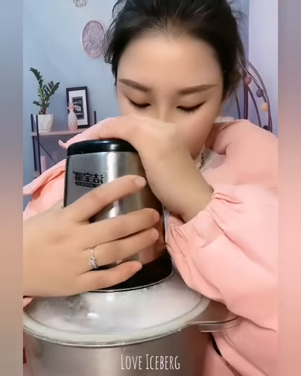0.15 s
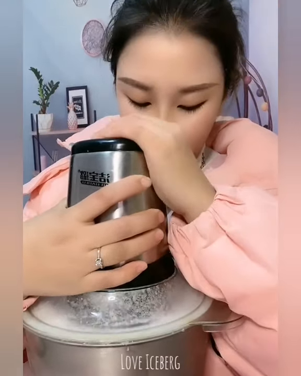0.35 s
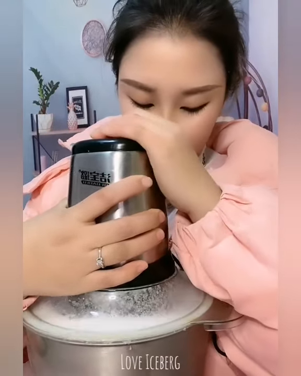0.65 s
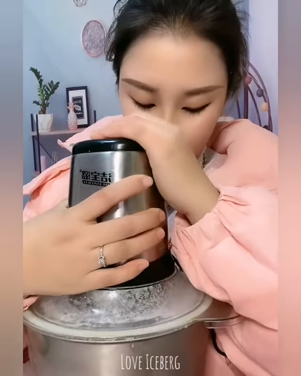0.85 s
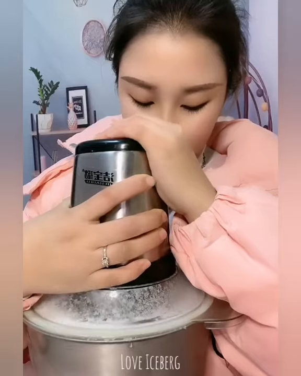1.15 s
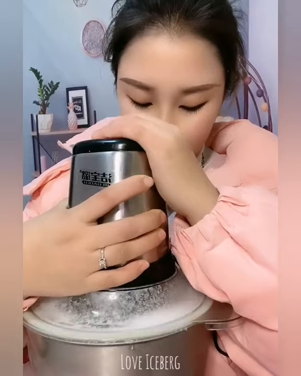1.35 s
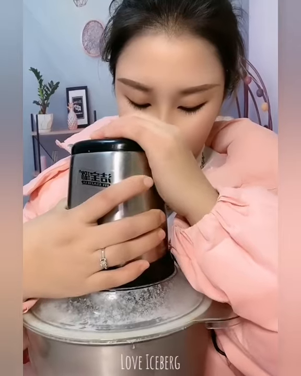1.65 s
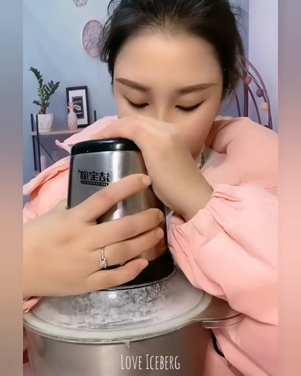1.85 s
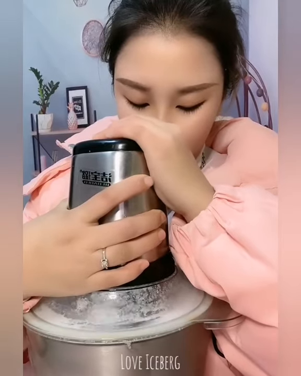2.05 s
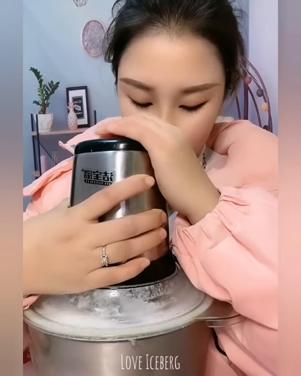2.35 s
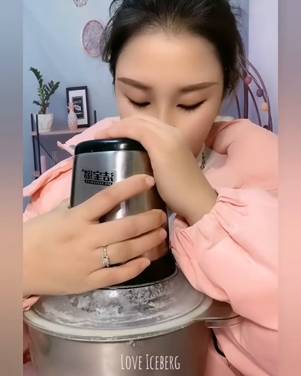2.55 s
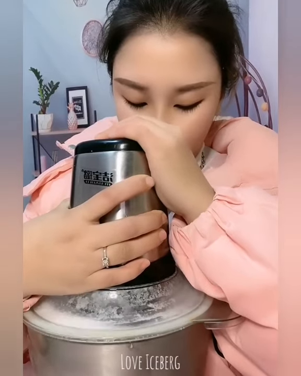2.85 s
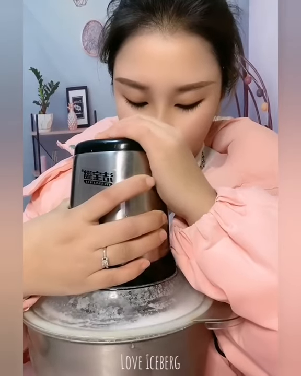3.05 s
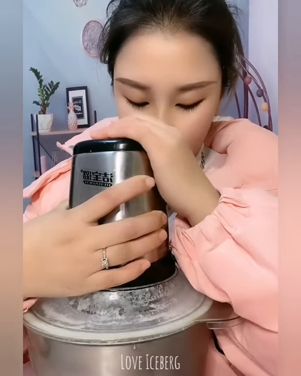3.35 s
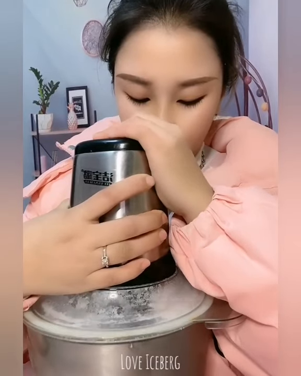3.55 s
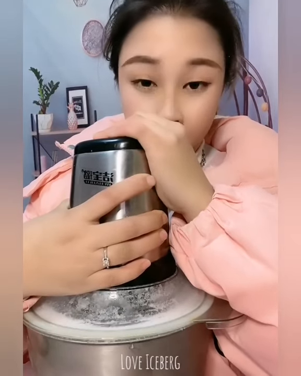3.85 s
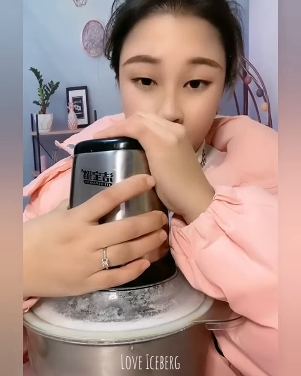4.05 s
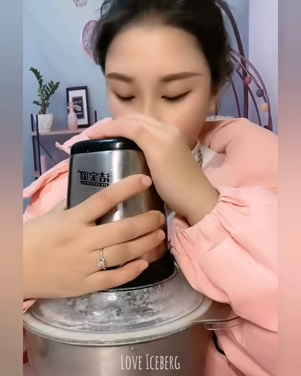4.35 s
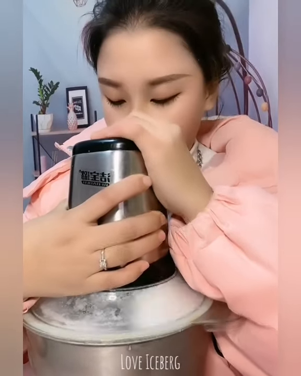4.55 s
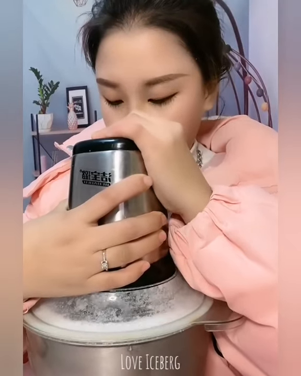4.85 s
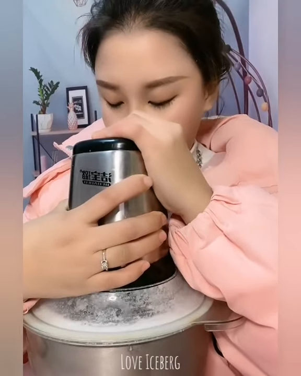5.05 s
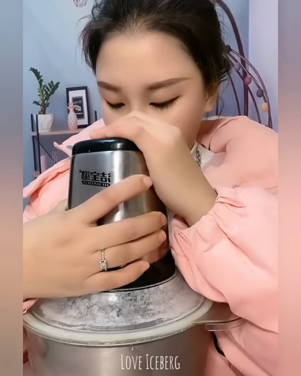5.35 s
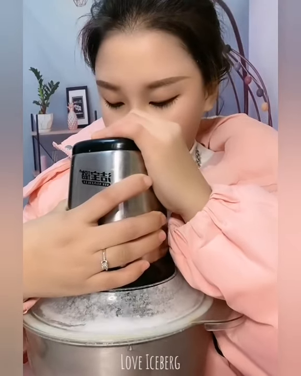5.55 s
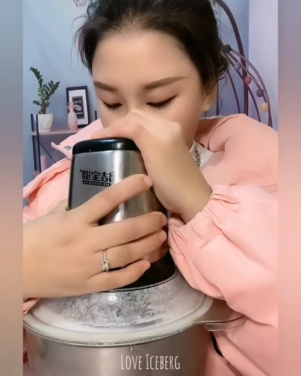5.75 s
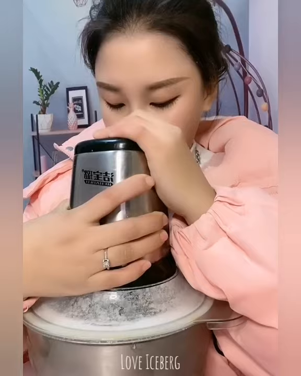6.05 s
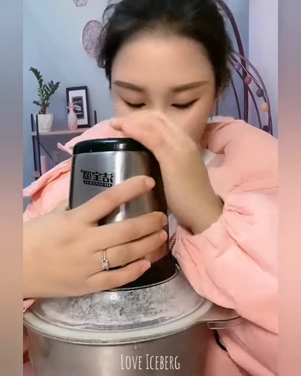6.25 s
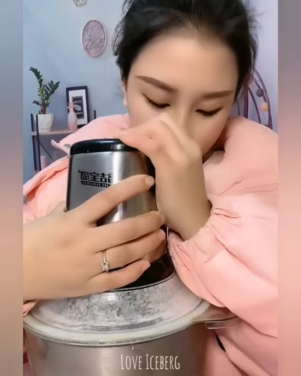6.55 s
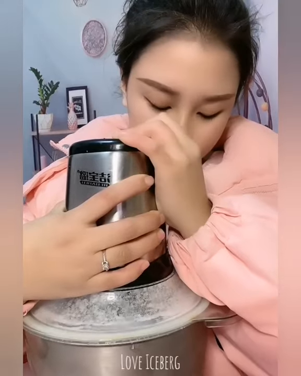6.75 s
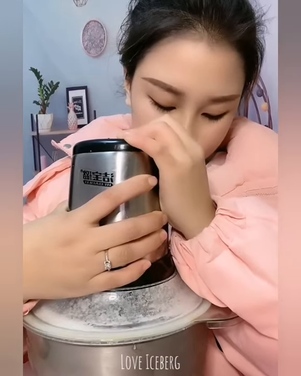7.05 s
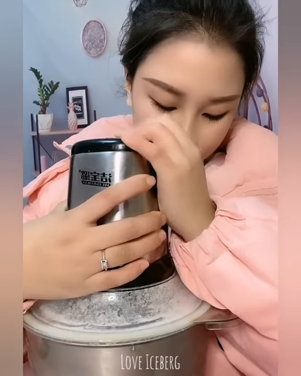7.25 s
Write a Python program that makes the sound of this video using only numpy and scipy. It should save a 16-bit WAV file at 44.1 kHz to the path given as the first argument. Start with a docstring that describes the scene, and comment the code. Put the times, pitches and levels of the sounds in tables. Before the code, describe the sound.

An electric food chopper is pulsed eight times over ice in a steel bowl, each loud rattling burst whining up, then tumbling to a stop.

```python
"""Eight noisy bursts: an electric food chopper is pulsed over ice cubes in a steel bowl, close by in a small room.
At each press the motor whines up and the ice churns: lumps thud, the steel clatters, chips crackle.
After each release the blades coast and the last lumps tumble; the bowl hums in short swells.
Random lumps and chips drive a filtered bowl; whine, growl and hum are tones; whole cubes strike one by one."""
import sys
import numpy as np
from scipy import signal
from scipy.fft import rfft, irfft
from scipy.io import wavfile
from scipy.ndimage import uniform_filter1d

SR = 44100
rng = np.random.default_rng(int(sys.argv[2]) if len(sys.argv) > 2 else 0)


def transcribe(signal):
    """Save signal, clipped to [-1, 1], as a 16-bit WAV file at the path in sys.argv[1]."""
    frames = np.atleast_2d(signal).T
    limited = np.clip(frames, -1, 1)
    pcm = np.round(limited * 32767).astype(np.int16)
    wavfile.write(sys.argv[1], SR, pcm)


N = 326781
TIME = np.arange(N) / SR
CUTOFF_HZ = 15900
MESH_PER_TURN = 27  # gear teeth that mesh in one turn of the blade shaft

# presses of the switch: on t/s, off t/s, gear whine at full speed f/Hz, whine level before a common trim/dB,
#   extra ring of the wall (gain), extra ring of the lid (gain), tumbling of the ice after release t/s,
#   extra rumble/dB, extra crackle/dB
PRESS_TABLE = [(0.111, 0.575, 2940, -25, 0.041, .05, 0.17, 0.5, -1),
               (0.921, 1.277, 3052, -20.5, 1.3, .05, 0.12, -0.5, -.8),
               (1.702, 2.191, 2990, -19, 1.5, 0.055, 0.17, -0.5, 0),
               (2.573, 3.08, 3000, -20, 0.69, .05, 0.18, -5.5, -1),
               (3.497, 4.131, 3090, -21.5, 0.092, 0.33, 0.14, 2, -1),
               (4.523, 5.12, 3120, -21, 0.042, 0.9, .2, 5.5, 0.75),
               (5.492, 6.027, 3160, -18.5, 0.047, 0.55, 0.19, 0.5, -0.8),
               (6.428, 7.218, 3170, -20, 1.6, 0.65, .2, -3, -2.35)]
# crackle of the churning ice: level at full speed/dB, change towards standstill/dB,
#   linger after the tumbling t/s, fall after that/(dB/s), level at rest/dB
CRACKLE_REGISTER = (-19.1, -12.5, 0, 170, -58)


def from_db(db):
    """Turns decibels into an amplitude gain."""
    return 10 ** (np.asarray(db) / 20)


def rms_one(x):
    """Scales a signal to an rms of 1."""
    return x / np.sqrt(np.mean(x ** 2) + 1e-20)


def at_hz(points, hz):
    """Reads a table on a log-frequency axis."""
    table_hz, value = np.array(points).T
    return np.interp(np.log(hz + 1e-9), np.log(table_hz), value)


def passed(x, hz, kind, order=2):
    """Butterworth filter."""
    sections = signal.butter(order, hz, kind, fs=SR, output="sos")
    return signal.sosfilt(sections, x + 1e-18)


def drift(rate):
    """Random wander with an rms of 1, drawn through `rate` new values a second."""
    knots = np.arange(0, TIME[-1] + 1, 1 / rate)
    return rms_one(np.interp(TIME, knots, rng.standard_normal(len(knots))))


def steadied(x, window_s):
    """Brings the short-term rms to 1 and keeps the faster grain."""
    size = int(window_s * SR)
    power = uniform_filter1d(uniform_filter1d(x ** 2, size), size)
    return x / np.sqrt(np.abs(power) + 1e-12)


def rough_tone(hz, shakes_per_s):
    """A tone whose strength and phase are shaken at random, as by blows on the blades."""
    phase = 2 * np.pi * np.cumsum(hz) / SR
    return np.sin(phase) * drift(shakes_per_s) + np.cos(phase) * drift(shakes_per_s)


def churn(bowl, pitch, speed, press, snow_hz=6000, soft_hz=170):
    """Ice and drive shake the bowl; powdered ice swishes round it and keeps sliding when the blades slow."""
    # registers of the churning ice: level at full speed/dB, change towards standstill/dB,
    #   linger after the tumbling t/s, fall after that/(dB/s), level at rest/dB
    rumble_register = (-32.8, 3.5, -0.07, 103, -51)
    thud_register = (-18, -3.5, 0, 112, -50)
    clatter_register = (-14, -8.5, 0, 195, -50.5)
    snow_register = (-32, -14, .09, 380, -73)
    wall_band_hz, lid_band_hz = [1090, 1220], [3400, 3750]
    heave_depth_db, heaves_per_s, thud_heave_share = 1.65, 11, 0.2

    body = signal.oaconvolve(ice(pitch, speed) + growl(pitch, speed), bowl)[:N]
    low, clatter, crackle = registers(body)
    rumble = passed(low, 150, "low", order=4)
    thud = passed(low, 146, "high", order=4)
    soft_thud = passed(thud, soft_hz, "low", order=1)
    thud = soft_thud * (1 - speed) + thud * speed  # slow lumps land softly

    # bare steel rings more than steel packed with ice
    *_, wall_ring, lid_ring, _, rumble_db, crackle_db = np.array(PRESS_TABLE)[press].T
    clatter = clatter + wall_ring * passed(clatter, wall_band_hz, "band", order=1)
    crackle = crackle + lid_ring * passed(crackle, lid_band_hz, "band", order=1)

    hiss = rng.standard_normal(N)
    snow = passed(signal.oaconvolve(hiss, bowl)[:N], snow_hz, "high")
    heave_db = heave_depth_db * drift(heaves_per_s)  # the load shifts and the low end surges
    layers = [(rumble, rumble_register, rumble_db + heave_db),
              (thud, thud_register, thud_heave_share * heave_db),
              (clatter, clatter_register, 0),
              (crackle, CRACKLE_REGISTER, crackle_db),
              (snow, snow_register, crackle_db)]
    mix = 0
    for layer, register, extra_db in layers:
        mix = mix + churn_level(register, extra_db, speed, press) * steadied(layer, 0.064)
    return mix


def ice(pitch, speed, lumps_per_s=280, idle_per_s=110, spread_db=5.5,
        chips_per_s=2000, chip_spread_db=5.0, chips_db=-15, sweep_db=3, count=10):
    """Blades throw lumps and showers of chips at random spots of the wall, in surges as they sweep round."""
    turns_per_s = pitch / MESH_PER_TURN * (1 + 0.23 * drift(25))
    sweep = np.sin(2 * np.pi * np.cumsum(turns_per_s) / SR)
    surge = from_db(sweep_db * sweep * speed)

    lump_hits = rng.random(N) < (idle_per_s + lumps_per_s * speed) / SR
    lumps = lump_hits * from_db(spread_db * np.clip(rng.standard_normal(N), -2, 2))
    chip_hits = rng.random(N) < chips_per_s / SR
    chips = chip_hits * from_db(chips_db + chip_spread_db * np.minimum(rng.exponential(1, N), 4))

    sign, spot = rng.choice([-1, 1], N), rng.integers(0, count, N)
    wall = 0
    for k in range(count):
        here = surge * sign * (spot == k)
        lump_force = passed(lumps * here, 5900, "low", order=1)
        chip_force = passed(chips * here, 1400, "high", order=1)  # light chips carry no bass
        wall = wall + signal.oaconvolve(lump_force + chip_force, impact())[:N]
    return steadied(wall, 0.13)


def impact(crack=0.49, room_db=-15, room_t60=0.45, size=8192, count=10):
    """One spot of the wall: a sharp crack, dense short modes as bands of dying noise, then a faint room tail."""
    # how long one impact rings: f/Hz, fall by 60 dB t/s
    ring_times = [(100, 0.051), (700, 0.039), (2500, 0.051), (10000, 0.022)]
    t, edges, out = TIME[:size], np.geomspace(30, CUTOFF_HZ, count), np.zeros(size)
    room = from_db(room_db) * rms_one(from_db(-60 * t / room_t60))
    for low, high in zip(edges, edges[1:]):
        t60 = at_hz(ring_times, np.sqrt(low * high))
        decay = rms_one(from_db(-60 * t / t60)) + room
        noise = rng.standard_normal(size) * decay
        out += passed(noise, [low, high], "band") / np.sqrt(size)
    out[0] += crack
    return out


def growl(pitch, speed, growl_db=-16, coast_db=8.5):
    """Rough low orders of the blade shaft; they stand out as the blades slow down."""
    # growl of the drive: multiple of the shaft's turning rate, level among the orders/dB
    shaft_orders = [(1, -8), (3, -1.5), (4, -2), (7, -2), (8, -3), (12, -1), (18, -1), (27, 0)]
    shaft = pitch / MESH_PER_TURN
    orders = 0
    for multiple, level_db in shaft_orders:
        orders = orders + from_db(level_db) * rough_tone(multiple * shaft, 22 + 3 * multiple)
    return from_db(growl_db + coast_db * (1 - speed)) * np.sqrt(speed) * rms_one(orders)


def bowl_response(size=8192):
    """Causal (minimum-phase) impulse response of the bowl: its resonances stand on the broad colour."""
    # broad colour of the filled bowl: f/Hz, relative level/dB
    colour = [(18, -70), (30, -16.5), (100, -6.5), (157, -9), (198, -7), (232, -6.5), (326, -0.5),
              (629, -7), (775, -5.5), (982, -7), (1150, -8.5), (2210, -15.5), (5690, -18), (8660, -19.5),
              (15800, -48)]
    # resonances of bowl and lid: centre f/Hz, width f/Hz, lift/dB
    resonances = [(114, 9.5, 1.5), (197.5, 26.5, 6), (256, 17, 6), (331, 63, 3.5), (460, 56, 6),
                  (715, 29, 5.5), (781, 89, 10.5), (1079, 22, 7), (1132, 11.4, 8.5), (1187, 16, 5),
                  (1283, 28, 7), (1655, 26, 6), (2000, 28, 3.5), (2780, 27, 3), (3248, 57, 9),
                  (3502, 107, 8), (3865, 61, 6), (4285, 270, 6.5), (4965, 320, 5.5), (5650, 140, 3.5),
                  (8400, 430, 1), (11140, 790, 4.5)]
    hz = np.arange(size // 2 + 1) * SR / size
    level_db = at_hz(colour, hz)
    for centre, width, lift_db in resonances:
        level_db = level_db + lift_db / (1 + (2 * (hz - centre) / width) ** 2)
    # folding the cepstrum puts the energy as early as possible
    cepstrum = irfft(np.log(from_db(level_db)))[:size // 2]
    cepstrum[0] = 0  # leaves the overall level out
    return irfft(np.exp(rfft(2 * cepstrum, size)))[:size // 2]


def registers(x, thud_hz=550, crack_hz=1900):
    """Splits bowl sound into the thud of lumps, the clatter of steel and the crackle of chips."""
    thud = passed(x, thud_hz, "low", order=4)
    clatter = passed(x, [thud_hz, crack_hz], "band", order=4)
    crackle = passed(x, crack_hz, "high", order=4)
    return thud, clatter, crackle


def churn_level(register, extra_db, speed, press, pick_up_s=0.0051):
    """Gain of one register: comes in with the press, follows blade speed, dies once the ice stops tumbling."""
    full_db, slow_db, linger_s, fall_db_per_s, rest_db = register
    on, off, tumble_s = np.array(PRESS_TABLE)[:, [0, 1, 6]].T
    since_on = np.maximum(TIME - on[press], 0)
    pick_up = 1 - np.exp(-(since_on / pick_up_s) ** 2)  # the blades take hold of the ice
    settled_s = np.maximum(TIME - (off + tumble_s + linger_s)[press], 0)
    level_db = full_db + extra_db + slow_db * (1 - speed) - fall_db_per_s * settled_s
    return np.hypot(pick_up * from_db(level_db), from_db(rest_db))


def motor(spin_up_s=.048, loosen_s=.29, drag=.2, coast_s=.26, friction=.15):
    """Whine pitch, speed 0-1 and press number: a quick start, a slow gain as the ice loosens, then coasting."""
    on, off, full_hz = np.array(PRESS_TABLE)[:, :3].T
    press = np.maximum(np.searchsorted(on, TIME) - 1, 0)
    powered = np.clip(TIME - on[press], 0, (off - on)[press])
    coasting = np.maximum(TIME - off[press], 0)
    driven = 1 - (1 - drag) * np.exp(-powered / spin_up_s) - drag * np.exp(-powered / loosen_s)
    run_down = (1 + friction) * np.exp(-coasting / coast_s) - friction  # friction brings a full stop
    speed = np.maximum(driven * run_down, 0)
    return full_hz[press] * speed, speed, press


def whine(pitch, speed, press, housing_hz=2580, housing_width_hz=560,
          octave_db=-4, whine_db=-3, unload_s=0.032):
    """Gear mesh tone and octave: strong where it crosses the housing's resonance, fading as the gears unload."""
    off, _, level_db = np.array(PRESS_TABLE)[press, 1:4].T
    load = np.exp(-np.maximum(TIME - off, 0) / unload_s)
    housing = 1 / np.sqrt(1 + (2 * (pitch - housing_hz) / housing_width_hz) ** 2)
    shaken = pitch * (1 + .012 * drift(60))
    mesh, octave = rough_tone(shaken, 260), rough_tone(2 * shaken, 580)
    gain = from_db(level_db + whine_db) * load * speed * housing
    return gain * (mesh + from_db(octave_db) * octave)


def blows(bowl, thud_db=-7, clatter_db=-9, crack_db=-7, ring_db=-14, ring_t60=0.037,
          snap=2.5, snap_hz=6500, bite_s=0.00059, size=8192):
    """Whole cubes strike: each has its own weight, brittleness and ring, and snaps brightly as it splits."""
    # hard blows of cubes on blade and wall: t/s, strength/dB, thud re strength before trim/dB,
    #   crack re strength before trim/dB, ringing pitch f/Hz
    cube_blows = [(0.054, -36.5, -16, 2, 2040), (0.127, 0.5, -4.5, -7.5, 2000), (0.653, -12, 8, -17, 1940),
                  (0.679, -18.5, -14, 3.5, 1900), (0.738, -16, 10, 3, 3170), (0.793, -24, 2, -24, 1640),
                  (0.826, -25, 11, -8, 1620), (0.936, -0.5, -3, -8.5, 1500), (0.97, -13.5, -17, 2.5, 3300),
                  (1.017, -16.5, -5, 3.5, 2400), (1.342, -14, 4, -17, 1430), (1.355, -19, 0, -0.5, 1600),
                  (1.412, -7, 3, 1, 1540), (1.45, -23, 10, -3, 6740), (1.545, -12, -10, -7.5, 1520),
                  (1.568, -15.5, -3.5, -5, 1600), (1.645, -19.5, -7, -22, 1550),
                  (1.668, -15, -24, -12, 1520), (1.716, -6.5, -25, 1.5, 6080), (2.273, -19.5, 9, 9.5, 1610),
                  (2.314, -16.5, 13.5, -5, 1610), (2.361, -11.5, -2, -5.5, 2060),
                  (2.402, -9.5, 1.5, -2.5, 3227), (2.494, -19, -16, -1, 1880),
                  (2.518, -18.5, -12, -11, 1580), (2.589, 1.5, -13, -10.5, 1566),
                  (3.114, -4.5, -20, -19, 4300), (3.199, -12, 6, -4, 1700), (3.264, -6, 0.5, -6.5, 1710),
                  (3.4, -19, -18, -2, 1960), (3.51, -6, 3.5, -4.5, 1880), (4.279, -10, 7.5, -0.5, 1380),
                  (4.536, -4.5, 1, 2, 3340), (5.335, -16.5, 10, 3.5, 1680), (5.509, 1.5, -4.5, -7.5, 1618),
                  (6.133, -14, 10, -19, 3130), (6.241, -17.5, 11.5, 7.5, 5126), (6.44, 1, -29, -13, 2000),
                  (6.485, -13, -23, 4.5, 3220)]
    soft_db, hard_db, soft_hz = -21.5, -13, 5370  # from dull knocks to bright splits as they get louder
    split_s, split_db = 0.0069, -12  # a struck cube cracks once more as it splits

    out, t = np.zeros(N + size), TIME[:size]
    bite = 1 - np.exp(-t / bite_s)  # brittle ice gives way gradually
    for s, strength_db, weight_db, brittle_db, hz in cube_blows:
        strike = impact(crack=.7, room_db=-16, room_t60=.22)
        thud, clatter, crack = registers(signal.fftconvolve(strike, bowl)[:size])

        hard = np.clip((strength_db + brittle_db - soft_db) / (hard_db - soft_db), 0, 1)
        bright = crack + snap * passed(crack, snap_hz, "high", order=1)
        dull = passed(crack, soft_hz, "low")
        crack = hard * bright + (1 - hard) * dull
        split_delay = split_s * rng.uniform(.7, 1.5)
        crack = crack + from_db(split_db) * np.interp(t - split_delay, t, crack, left=0)
        ring = np.sin(2 * np.pi * hz * t) * from_db(-60 * t / ring_t60)

        start = int(s * SR)
        layers = [(thud, thud_db + weight_db), (clatter, clatter_db),
                  (crack, crack_db + brittle_db), (ring, ring_db + .5 * brittle_db)]
        for layer, level_db in layers:
            part = layer * bite
            onset_rms = np.std(part[:size // 20])
            out[start:start + size] += from_db(strength_db + level_db) * part / onset_rms
    return out[:N]


def shards(speed, press, count=420, shard_db=-2, spread_db=4.5,
           low_hz=1500, high_hz=9500, cycles=110, size=4096):
    """Flying splinters tinkle, each at the pitch of its own size, and follow blade speed and crackle level."""
    out, t = np.zeros(N + size), TIME[:size]
    for when, pitch_share, chance in rng.random((count, 3)):
        hz, start = low_hz * (high_hz / low_hz) ** pitch_share, int(when * N)
        ring = np.sin(2 * np.pi * hz * t) * from_db(-60 * t * hz / cycles)  # falls 60 dB in `cycles` swings
        strength = from_db(-spread_db * np.log(.05 + chance))  # few loud, many faint
        out[start:start + size] += strength * np.sqrt(low_hz / hz) * ring
    return out[:N] * speed * churn_level(CRACKLE_REGISTER, shard_db, speed, press)


def hum(lower_hz=204.4, upper_hz=293, rise_db_per_s=220, fall_db_per_s=91):
    """The bowl's two lowest modes swell and sing on while the blades run down, with a slight pitch wobble."""
    # swells of the hum: crest t/s, lower mode level/dB, upper mode re lower/dB
    swells = [(0.0, -33, -13), (0.77, -16.5, -9), (1.49, -25, -2), (2.38, -15.5, -15), (3.28, -25, -6),
              (4.31, -24, 0.5), (5.31, -23.5, 2), (6.24, -16.5, -13)]
    wobble = 0.0047 * np.cumsum(drift(29.6)) / SR
    phase = 2 * np.pi * (TIME + wobble)
    lower, upper = np.sin(lower_hz * phase), np.sin(upper_hz * phase)
    out = 0
    for s, crest_db, upper_db in swells:
        below_crest_db = np.maximum(rise_db_per_s * (s - TIME), fall_db_per_s * (TIME - s))
        out = out + from_db(crest_db - below_crest_db) * (lower + from_db(upper_db) * upper)
    return out


def scene():
    """One microphone hears it all, alike in both channels."""
    bowl = bowl_response()
    pitch, speed, press = motor()
    mono = churn(bowl, pitch, speed, press)
    mono = mono + whine(pitch, speed, press)
    mono = mono + blows(bowl)
    mono = mono + shards(speed, press)
    mono = mono + hum()
    return np.array([mono, mono])


def record(dry):
    """The hardest peaks flatten at full scale; the top is cut."""
    clipped = dry / (1 + dry ** 8) ** (1 / 8)
    top_cut = signal.ellip(10, .1, 80, CUTOFF_HZ, fs=SR, output="sos")
    return signal.sosfilt(top_cut, clipped)


dry = scene()
out = record(dry)
transcribe(out)
```